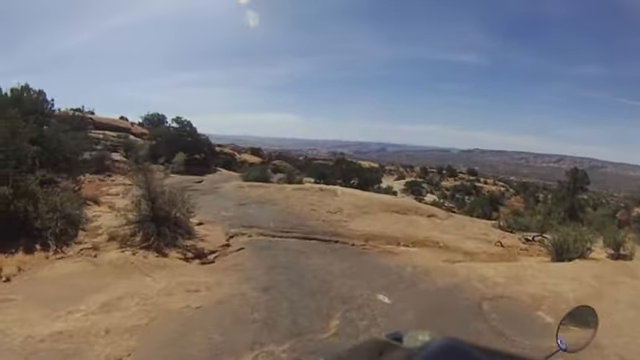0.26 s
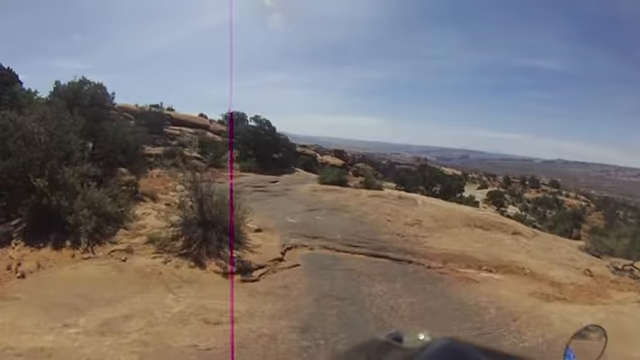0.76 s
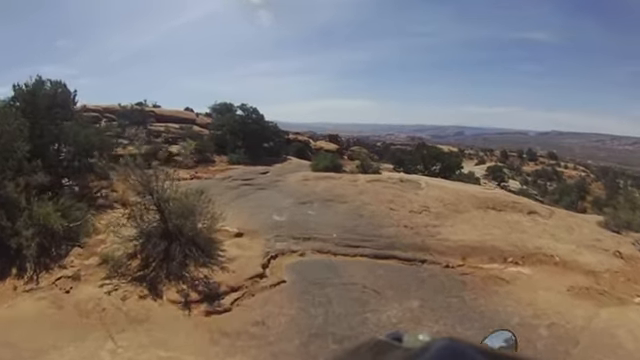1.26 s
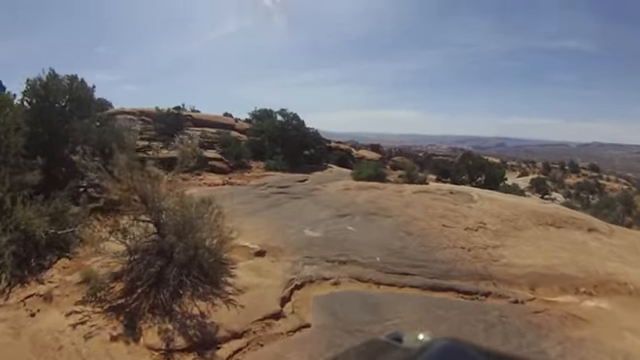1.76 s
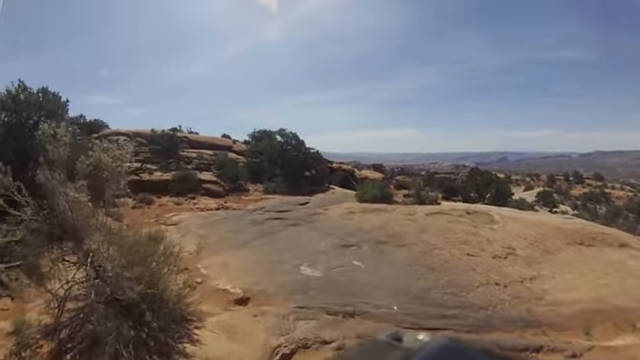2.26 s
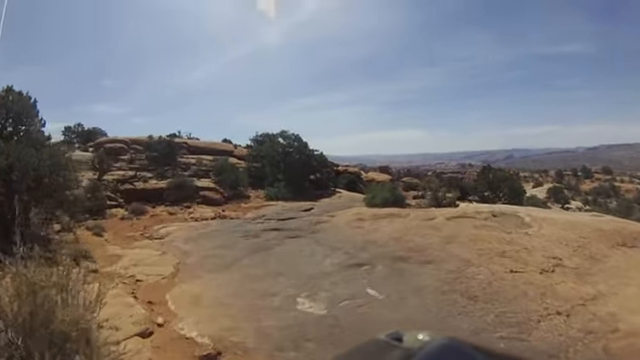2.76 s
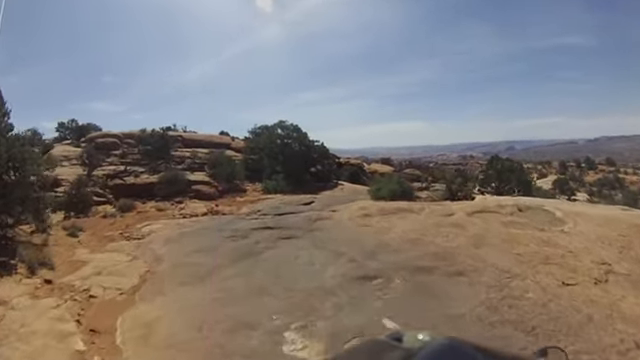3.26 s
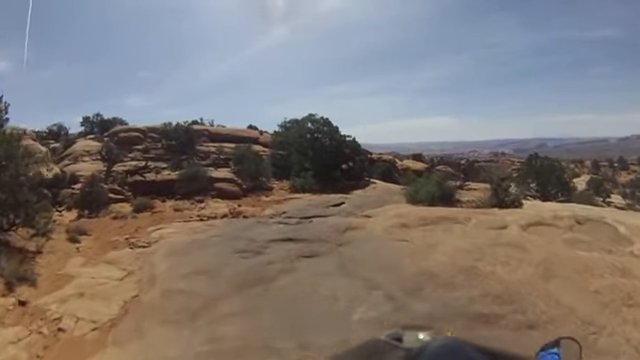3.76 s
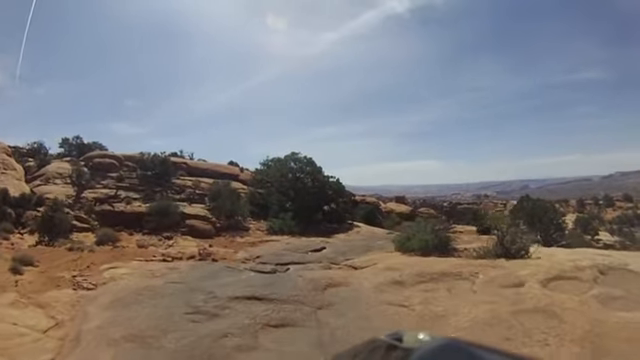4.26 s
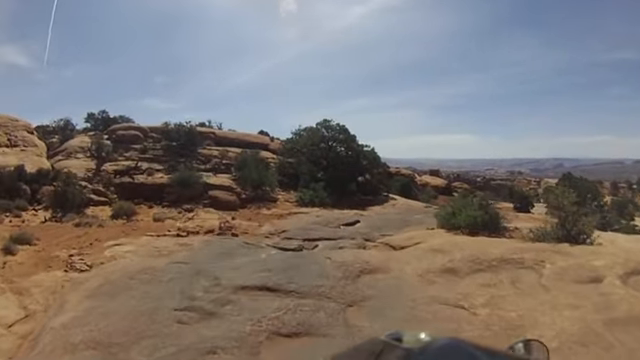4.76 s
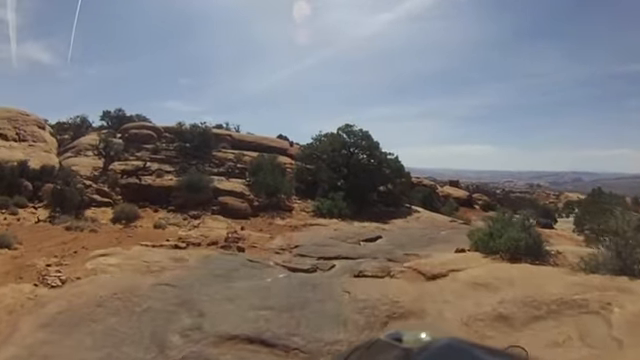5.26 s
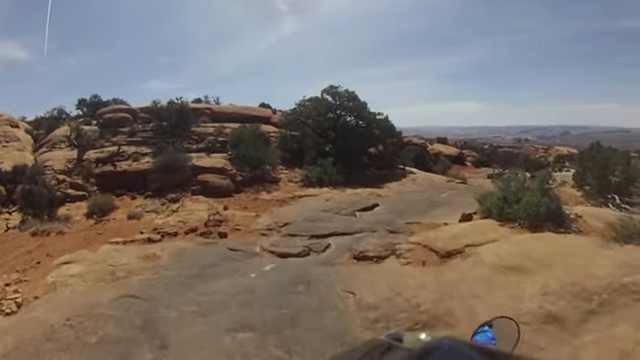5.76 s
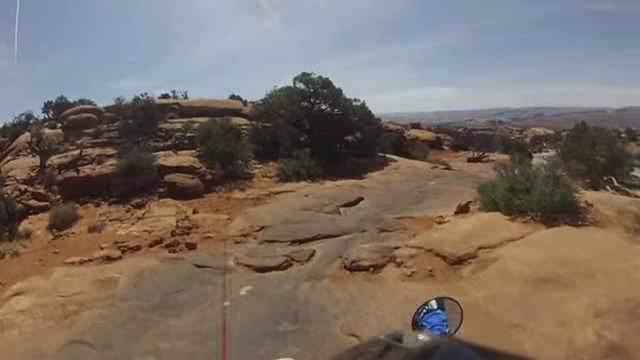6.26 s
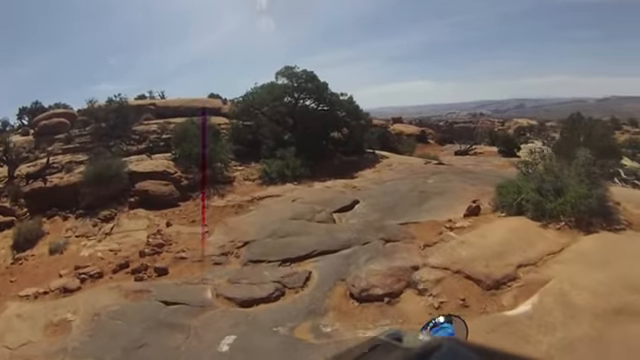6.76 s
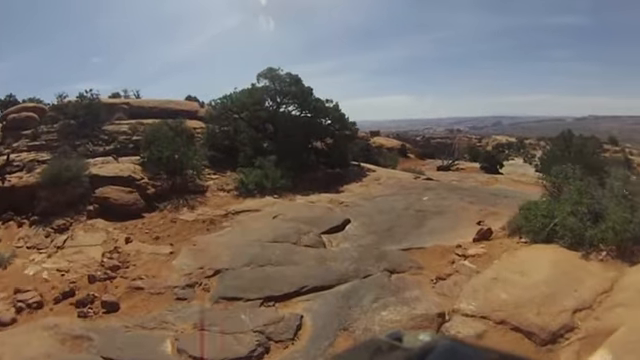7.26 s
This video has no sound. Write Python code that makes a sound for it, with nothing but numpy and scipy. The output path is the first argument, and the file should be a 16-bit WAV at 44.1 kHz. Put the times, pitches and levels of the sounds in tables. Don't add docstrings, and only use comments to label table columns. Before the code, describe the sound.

A single-cylinder trail bike creeps over dry open rock, heard close and boxy through a sealed helmet camera, nearly mono. It begins with slow, distinct thumps, about thirteen a second, leaps to a quick hard burst near 0.5 s, then drops back. From 1.2 to 2.9 s the firing stutters, many beats missing and replaced by soft puffs, with a sharp knock at 1.25 and a short gritty scrape at 2.55. It pulls fastest around 3.3 s, with a clunk at 3.2, then slows to firmer chugging. Between 4.3 and 4.7 s the thumps stop, leaving puffs, rattle and hiss. Slow beats return, lifting briefly at 5.8 s; a small gap and soft scrape follow at 6.5, another scrape at 6.9, with light knocks as it eases to a slow chug. Chain whine, metal clatter, low buffeting and fine hiss run throughout.

```python
import sys
import numpy as np
from scipy import signal
from scipy.fft import rfft, irfft
from scipy.io import wavfile
from scipy.ndimage import uniform_filter1d

SR = 44100
rng = np.random.default_rng(int(sys.argv[2]) if len(sys.argv) > 2 else 0)


def inscribe(sig):
    pcm = np.round(np.clip(np.atleast_2d(sig).T, -1, 1) * 32767)
    wavfile.write(sys.argv[1], SR, pcm.astype(np.int16))


def boost_factor(decibels):
    exponent = np.asarray(decibels, float) / 20
    return 10 ** exponent


N = 331191

# time in seconds, engine cycles per second.
SPEED = [(0.0, 13.121), (0.28, 14.603), (0.52, 23.217), (0.81, 16.402), (1.77, 22.184), (2.33, 20.722),
         (2.99, 22.478), (3.33, 25.236), (3.57, 17.966), (4.1, 17.324), (4.5, 19.645), (4.84, 13.263),
         (5.73, 17.285), (5.81, 19.656), (6.0, 16.24), (6.38, 16.738), (6.79, 12.719), (7.51, 12.269)]
# time in seconds, strength of a burning charge in dB,
# boom of the big muffler chamber against the small ones in dB, labouring of the metal in dB.
LOAD = [(0, -6, -7, -3), (.42, -2, 3.5, 7.5), (.77, -5, 1, -5), (1.2, -2, -2, -0.5), (1.8, -7, -1, 2.5),
        (2.05, -1.5, -22, -3), (2.33, -2, 3, -4), (2.7, -8, 5, 13), (2.93, -1, -0.5, 4),
        (3.45, -1, -9.5, 4), (4.12, -2, 4.5, 5.5), (4.85, -7.5, -4, -5), (5.05, -4, -5, -20),
        (5.63, -7, 3, -3), (5.77, 0.5, -11, 0), (6.36, -2.5, 6.5, 4), (6.75, -5.5, -3.5, 1),
        (7.51, -6, -2, 4.5)]
CRUISE_HZ = 18


def evened(x):
    return x / np.sqrt(np.mean(x ** 2) + 1e-20)


def curves(rows):
    s, *columns = np.transpose(rows)
    return [np.interp(np.arange(N) / SR, s, c) for c in columns]


def coloured(points, x):
    hz, db = np.transpose(points)
    log_hz = np.log(np.fft.rfftfreq(N, 1 / SR) + 1)
    gain_db = np.interp(log_hz, np.log(hz), db, right=-100)
    return evened(irfft(rfft(x) * boost_factor(gain_db), N))


def flicker(per_s):
    smooth = signal.butter(2, per_s, fs=SR, output="sos")
    return evened(signal.sosfilt(smooth, rng.standard_normal(N)))


def resonate(x, hz, width):
    turn = np.exp(2j * np.pi * np.cumsum(hz * np.ones(len(x))) / SR)
    r = np.exp(-np.pi * width / SR)
    smooth = signal.lfilter([(1 - r) ** 2], [1, -2 * r, r * r], x / turn)
    return 2 * (turn * smooth).real


def rings(x, modes):
    return evened(sum(boost_factor(db) * evened(resonate(x, hz, width)) for hz, width, db in modes))


def add(mix, s, sound):
    part = mix[round(s * SR):][:len(sound)]
    part += sound[:len(part)]


def after(times, levels_db, rise, t60):
    t, out = np.arange(4000) / SR, np.zeros(N)
    for s, db in zip(times, levels_db):
        add(out, s, boost_factor(db - 60 * t / t60) * (1 - np.exp(-(t / rise) ** 2)))
    return out


def swells(times, reaches, levels_db, floor_db):
    t = np.arange(N)[::64, None] / SR
    level_db = levels_db - 21.5 * abs(t - times) / reaches
    return np.maximum(level_db.max(1), floor_db).repeat(64)[:N]


def speed():
    # time in seconds, swing in cycles per second.
    snatches = [
        (1.19, -6.04),
        (2.55, 4.3),
        (3.23, -2.68),
        (3.54, -6.85),
        (3.8, -4.12),
        (4.98, 1.88),
        (6.48, -3.51),
    ]
    swing_s = 0.15
    t, hz = np.arange(N) / SR, curves(SPEED)[0]
    for s, swing in snatches:
        fade = np.clip(1 - abs(t - s) / swing_s, 0, 1)
        hz = hz + swing * fade * np.sin(4 * np.pi / 3 * (t - s) / swing_s)
    return hz


def cycles():
    # start in seconds, end in seconds.
    misfires = [(.87, .91), (1.235, 1.35), (1.41, 1.455), (1.505, 1.64), (1.69, 1.78), (1.83, 1.92),
                (1.965, 2.01), (2.105, 2.15), (2.245, 2.295), (2.345, 2.39), (2.44, 2.49), (2.54, 2.675),
                (2.72, 2.765), (2.81, 2.9), (3.08, 3.12), (3.2, 3.24), (3.28, 3.365), (3.455, 3.495),
                (4.34, 4.66), (5.155, 5.22), (6.47, 6.61)]
    # time in seconds, shortfall in dB.
    lean = [(.835, -9), (1.06, -7), (2.174, -6.5), (2.516, -1), (2.787, -16), (2.969, -5), (3.18, -3.5),
            (3.262, -6.5), (3.571, -8), (4.315, -9.5), (5.319, -3.5)]
    hz = speed()
    at = np.flatnonzero(np.diff(np.floor(-0.473 + np.cumsum(hz) / SR)))
    s, luck = at / SR, rng.standard_normal((6, len(at)))
    shortfall_db = sum(short * (abs(s - t) < 0.018) for t, short in lean)
    db = curves(LOAD)[0][at] + 0.4 * luck[0] + shortfall_db
    burns = ~np.any([(s > a) & (s < b) for a, b in misfires], axis=0)
    return s, hz[at], db, burns, luck[1:]


def amplifier_hiss(dry):
    # frequency in Hz, level in dB per Hz.
    hiss_colour = [(60, -23), (300, -38), (600, -14), (900, -5), (2700, 14.5), (5200, 11.5), (10700, 14),
                   (15500, 13)]
    shared, left, right = (coloured(hiss_colour, rng.standard_normal(N)) for _ in range(3))
    loud_db = 10 * np.log10(uniform_filter1d(dry[0] ** 2, size=SR // 3) + 1e-9) + 29
    hiss_db = -68 - 0.57 * loud_db + 0.5 * flicker(12)
    return (np.array([left, right]) + 0.62 * shared) * boost_factor(hiss_db)


def electronic_whistle():
    # frequency in Hz, level in dB.
    tones = [(11958, -94), (12018, -91)]
    t = np.arange(N) / SR
    return sum(np.sqrt(2) * boost_factor(db) * np.sin(2 * np.pi * hz * t) for hz, db in tones)


def buffet(s, hz, db, burns, luck):
    # frequency in Hz, level in dB per Hz.
    rumble_colour = [(15, -29), (30, -14), (50, -8.5), (75, 3.5), (110, -16), (160, -5)]
    # time in seconds, reach in seconds, level in dB.
    bumps = [(0, 0.93, -40), (.85, .4, -38), (1.4, 1.2, -37.5), (1.9, 0.72, -36.5), (2.5, .5, -33.5),
             (2.85, 0.66, -40.5), (3.25, 1.2, -38.5), (3.65, .5, -44), (4.5, 1.2, -39.5),
             (5.79, 1.5, -39.5), (7.198, 1.5, -40)]
    heave = boost_factor(-0.5) + after(s[burns], 0.5 * db[burns] + 1.5, rise=0.0097, t60=0.061)
    shake_db = swells(*np.transpose(bumps), floor_db=-47) - 3
    return coloured(rumble_colour, rng.standard_normal(N)) * boost_factor(shake_db) * heave


def scrapes():
    # start in seconds, level in dB, length in seconds.
    scrape_rows = [
        (2.547, -33.5, 0.052),
        (6.579, -41, 0.074),
        (6.933, -40.5, 0.052),
    ]
    # frequency in Hz, level in dB per Hz.
    scrape_colour = [(150, -18), (500, 8), (800, -5), (1050, -5), (1500, -12.5), (2300, -19.5), (4000, -50)]
    grit = coloured(scrape_colour, rng.standard_normal(N) * boost_factor(5.1 * flicker(300)))
    loudness = np.zeros(N)
    for s, db, length in scrape_rows:
        add(loudness, s, boost_factor(db) * signal.windows.tukey(round(length * SR), 0.6))
    return loudness * grit


def knocks():
    # start in seconds, peak in dB, ring in Hz, time to fall 60 dB in seconds.
    part_rows = [(0.2545, -42, 1400, 0.018), (4.987, -46, 1450, .02), (7.358, -44.5, 1400, 0.023),
                 (0.9382, -48, 2670, 0.025), (.9594, -54, 2900, 0.031), (1.2443, -32.5, 1470, 0.0065),
                 (1.285, -48, 1720, 0.017), (1.369, -41.5, 1150, .02), (1.382, -44.5, 1550, 0.029),
                 (1.7044, -51, 1420, 0.017), (2.1414, -53, 1290, .02), (2.2963, -49.5, 2370, 0.025),
                 (3.0132, -39, 1430, 0.019), (3.181, -32, 900, 0.018), (4.1616, -44, 1580, .02),
                 (4.362, -50.5, 2420, .045), (4.3844, -58, 2400, 0.022), (4.451, -41.5, 1430, 0.033),
                 (4.45, -52, 2300, 0.032), (6.28, -38, 1400, 0.013), (6.9666, -37.5, 1500, 0.01),
                 (7.091, -42.5, 1295, 0.015)]
    tick_rows = [
        (2.9956, -50, 4800, 0.018),
        (3.0147, -40.5, 9500, 0.0037),
        (4.115, -77, 4500, 0.012),
    ]
    out, t = np.zeros(N), np.arange(1500) / SR
    for s, db, hz, t60 in [*part_rows, *tick_rows]:
        burst = evened(resonate(rng.standard_normal(len(t)), hz, 0.31 * hz))
        add(out, s, boost_factor(db + 6 - 60 * t / t60) * burst * np.minimum(t / 0.00089, 1))
    return out


def frame():
    # time in seconds, reach in seconds, low ring in Hz, low ring in dB, high ring in dB.
    rattles = [(.1, 0.8, 726, -42.5, -52), (1.08, 0.36, 732, -50, -47.5), (1.28, 0.25, 763, -46, -44),
               (1.85, 0.65, 740, -46, -45), (2.36, 0.13, 737, -47.5, -37.5), (2.6, 0.9, 775, -47.5, -53),
               (3.16, 0.25, 711, -42.5, -44), (3.41, .25, 750, -46.5, -52), (3.842, 0.56, 718, -48.5, -50),
               (4.4, .2, 728, -52, -42.5), (4.75, 0.16, 732.5, -42, -46), (5.099, 0.29, 730, -42.5, -62),
               (5.282, 0.26, 760, -40.5, -46), (5.47, 0.25, 799, -37, -59), (5.68, 0.51, 774, -53, -46),
               (6.0, 0.15, 790, -46.5, -47), (6.22, 0.18, 787, -48.5, -46), (6.63, 0.38, 770, -45.5, -56),
               (6.97, .12, 742, -43.5, -57), (7.15, .25, 713, -64, -48)]
    s, reach, low_hz, low_db, high_db = np.transpose(rattles)
    low_path = np.interp(np.arange(N) / SR, s, low_hz)
    high_path = 911 + 14 * flicker(2)
    out = np.zeros(N)
    for hz, db in ((low_path, low_db), (high_path, high_db)):
        turns = np.cumsum(hz + 20 * flicker(16)) / SR
        whine = np.sqrt(2) * np.sin(2 * np.pi * turns) * boost_factor(3 * flicker(25))
        shake = 0.4 * whine + 0.74 * evened(resonate(rng.standard_normal(N), hz, 103))
        out = out + boost_factor(swells(s, reach, db, floor_db=-62.5) - 1.5) * shake
    return out


def cases(s, hz, db, burns, luck):
    # frequency in Hz, level in dB per Hz.
    clatter_colour = [(300, -7), (500, -5.5), (700, -3), (915, -10), (1050, -16), (1470, -14.5),
                      (2060, -23), (4360, -25.5), (5160, -25), (8000, -32.5), (15500, -40)]
    # frequency in Hz, width in Hz, level in dB.
    jingle_modes = [(5150, 490, -5), (5620, 125, -5.5), (5920, 610, -7)]
    # frequency in Hz, width in Hz, level in dB.
    crack_modes = [(970, 91, 10.5), (1400, 680, 13.5), (1704, 220, -14), (2280, 940, -1.5)]
    faster, (load_db, _, labour_db) = curves(SPEED)[0] - CRUISE_HZ, curves(LOAD)

    clatter_db = -58 + 0.05 * faster + 0.17 * load_db
    grains = rng.standard_normal(N) * boost_factor(1.13 * flicker(110))
    clatter = coloured(clatter_colour, grains) * boost_factor(clatter_db + 8 + 1.25 * flicker(4.9))

    jingle_db = -65 + 0.3 * faster + 0.86 * load_db + 1.2 * flicker(9)
    jingle = rings(rng.standard_normal(N) * boost_factor(3.9 * flicker(53)), jingle_modes)

    crack_db = -42 + 2 * db + 3.1 * luck[3] + labour_db[(s * SR).astype(int)]
    s, crack_db = s[burns], np.minimum(crack_db, -41.5)[burns]
    beats = after(s + 0.00048, crack_db + 2.5, rise=0.00068, t60=0.019)
    beats = beats + after(s + 0.0046, crack_db - 4.5, rise=0.0031, t60=0.12)
    crack = rings(rng.standard_normal(N), crack_modes) * boost_factor(2 * flicker(270)) * beats

    clicks = np.zeros(N)
    clicks[((s + 0.0035) * SR).astype(int)] = boost_factor(crack_db + 4)
    snap = np.zeros(N)
    for f, width, level in crack_modes[1:]:
        snap = snap + boost_factor(level) * np.sqrt(SR / width) * resonate(clicks, f, width)
    return clatter + crack + snap + jingle * boost_factor(jingle_db - 2.5)


def ring(modes, heat, boom_db, blow_size):
    t, blow = np.arange(4000) / SR * heat, np.hanning(blow_size)
    tones = [a * boost_factor(-60 * t / t60) * np.sin(2 * np.pi * hz * t) for hz, a, t60 in modes]
    open_s = 0.031
    fed_db = 4.5 * np.minimum(t / open_s, 1)
    shut_db = -3.5 * np.clip((t - open_s) / 0.004, 0, 1)
    chambers = boost_factor(boom_db) * sum(tones[:2]) + boost_factor(fed_db + shut_db) * sum(tones[2:])
    return np.convolve(chambers, blow / blow.sum())


def exhaust(s, hz, db, burns, luck):
    # frequency in Hz, signed pressure, time to fall 60 dB in seconds.
    muffler = [(125, -0.006, 0.064), (146.8, -0.12, 0.096), (212.4, -0.15, 0.059), (266.8, 0.27, 0.042),
               (407.3, 0.16, 0.035), (470.6, -0.052, 0.035)]
    intake = [(244.6, -1.6, 0.026), (153.2, 0.95, 0.067)]
    # frequency in Hz, level in dB per Hz.
    gas_colour = [(60, -17), (110, 3.5), (150, -1.5), (190, -1.5), (245, -2), (345, -5.5), (420, -4),
                  (540, -11), (1000, -19.5), (2000, -34)]
    out, boom_db = np.zeros(N), curves(LOAD)[1]
    heats = 1.016 + 0.035 * luck[0]
    for start, level, heat in zip(s[burns], db[burns], heats[burns]):
        soft = round(3.5 * max(-level, 0))
        boom = 0.5 * boom_db[int(start * SR)] + 2
        thump = ring(muffler, heat, boom, blow_size=80 + soft)
        add(out, start - 0.0006 - soft / 2 / SR, boost_factor(level) * thump)

    empty = ~burns
    late_db = np.where(burns, -30 - 0.45 * db, -26.5) + 2 * luck[1]
    empty_db = -24.5 + 2 * luck[0, empty]
    puff_s = np.r_[s + (0.2808 + 0.03 * luck[2]) / hz, s[empty]]
    puff_db = np.r_[late_db, empty_db] + 0.3 * (np.r_[hz, hz[empty]] - CRUISE_HZ)
    puff = ring(intake, heat=1, boom_db=0, blow_size=111)
    for start, level in zip(puff_s, puff_db):
        add(out, start, boost_factor(level) * puff)

    shut = np.interp(np.arange(N) / SR, s, empty)
    gas_db = -44 + 0.48 * (curves(SPEED)[0] - CRUISE_HZ) + 3 * shut
    surge = after(s[burns], db[burns] - 31, rise=0.0049, t60=0.056)
    surge = surge + after(puff_s, puff_db - 21.5, rise=0.0025, t60=0.052)
    gas = coloured(gas_colour, rng.standard_normal(N))
    return out + (surge + boost_factor(gas_db + 2.3 * flicker(22.6))) * gas


def scene():
    engine = cycles()
    bike = buffet(*engine) + scrapes() + knocks() + frame() + cases(*engine) + exhaust(*engine)
    lean_db = 0.06 + 0.08 * flicker(40)
    return bike * boost_factor(np.array([[-1], [1]]) * lean_db)


def band_limit(x):
    return signal.sosfilt(signal.butter(12, 15300, fs=SR, output="sos"), x)


def record(dry):
    bent = dry - 0.61 * dry ** 2
    sealed = signal.sosfilt(signal.butter(2, 34, "high", fs=SR, output="sos"), bent)
    return band_limit(sealed + amplifier_hiss(dry) + electronic_whistle())


dry = scene()
out = record(dry)
inscribe(out)
```